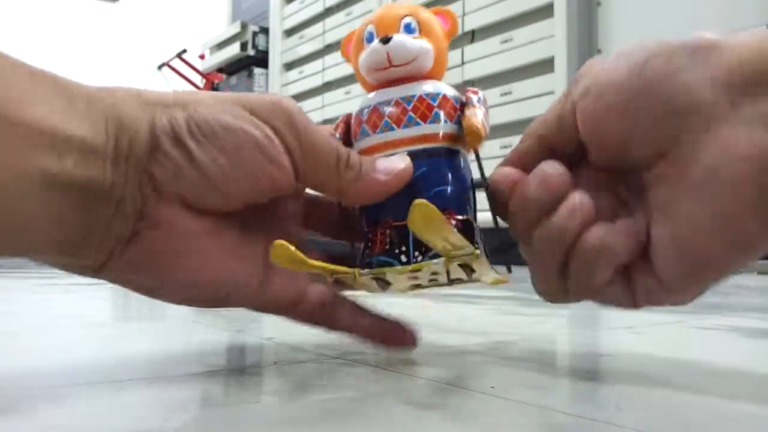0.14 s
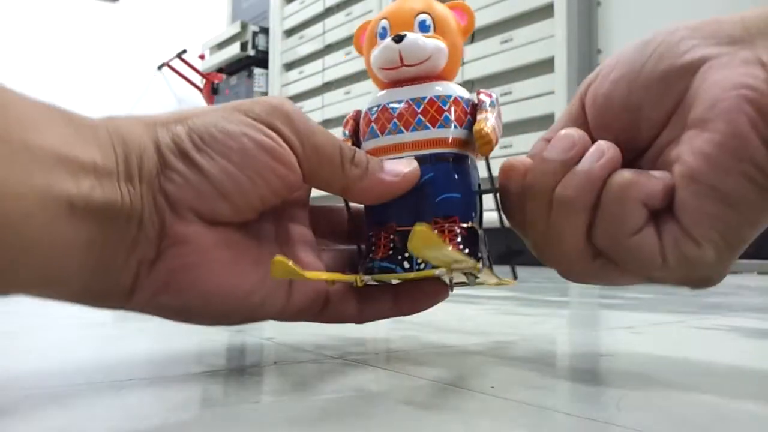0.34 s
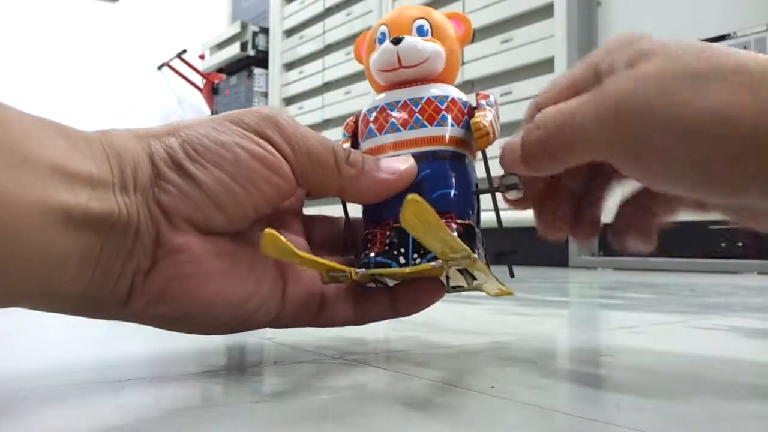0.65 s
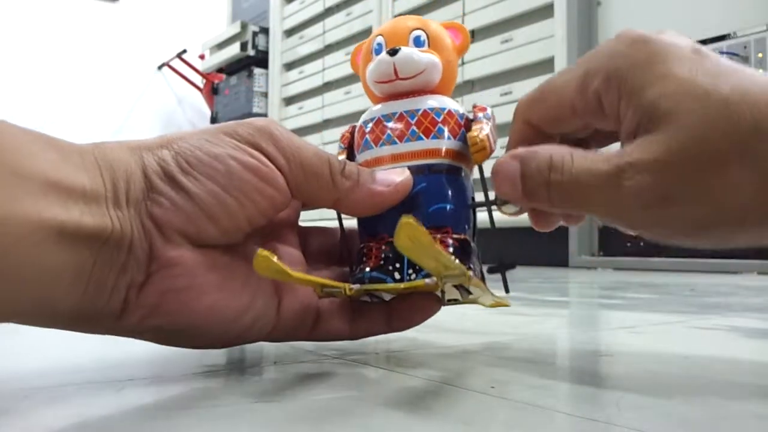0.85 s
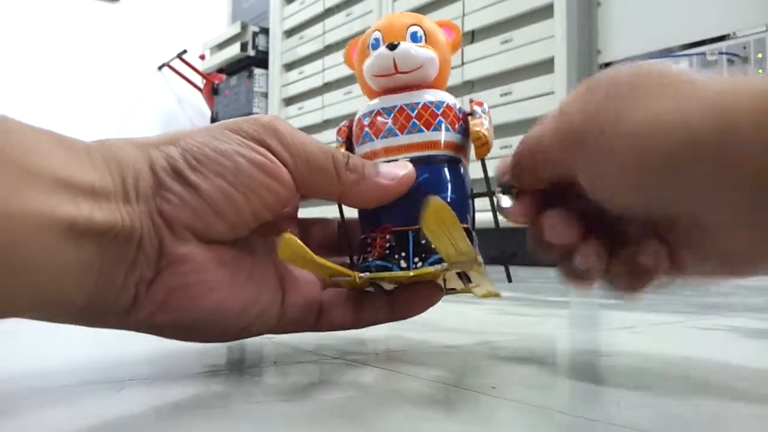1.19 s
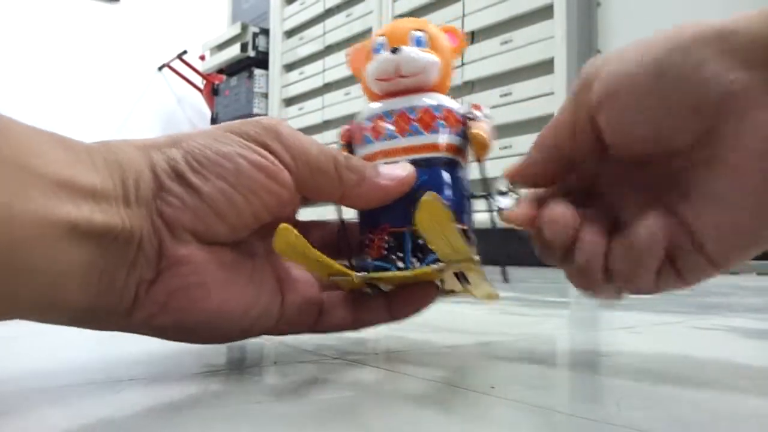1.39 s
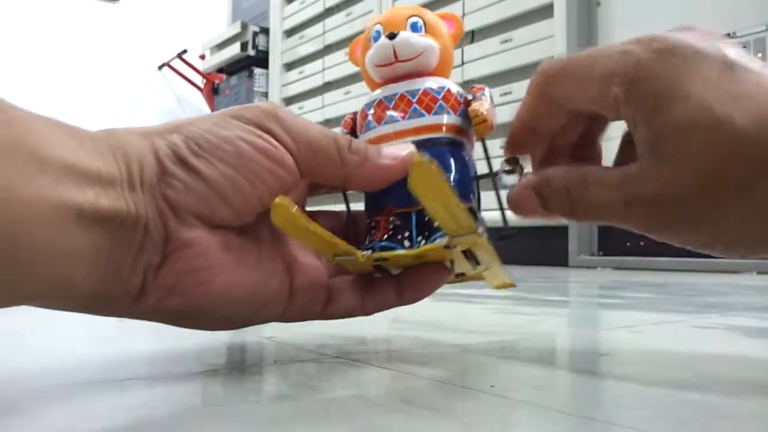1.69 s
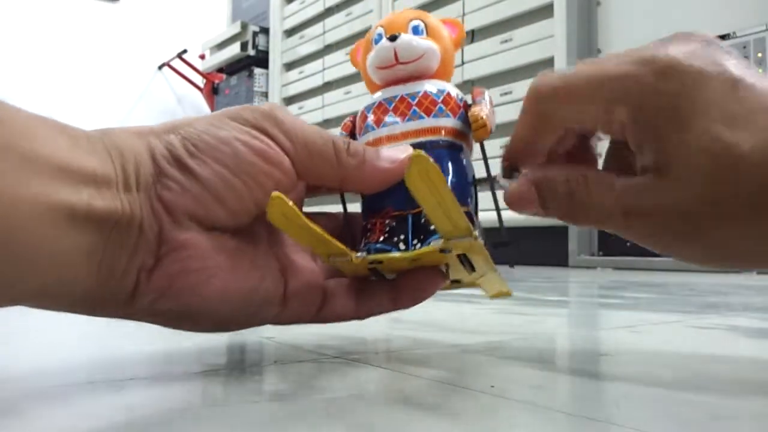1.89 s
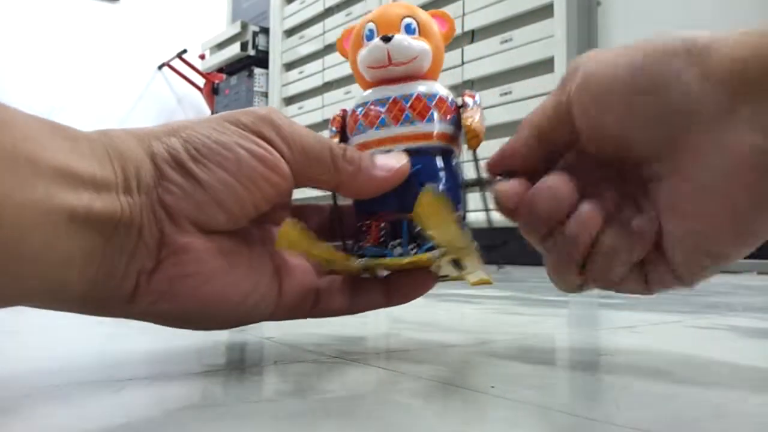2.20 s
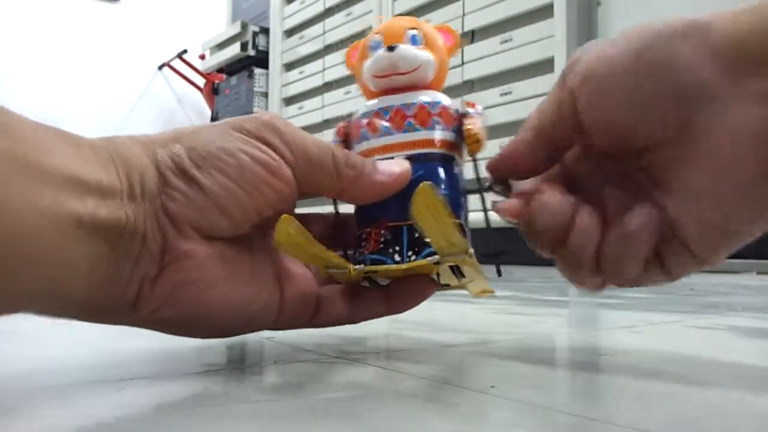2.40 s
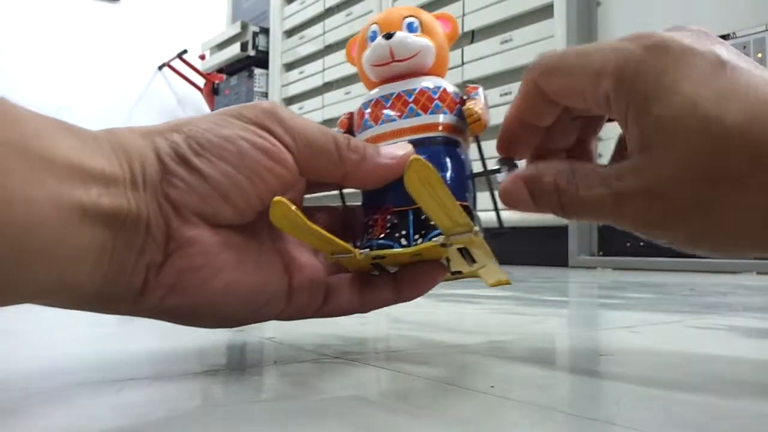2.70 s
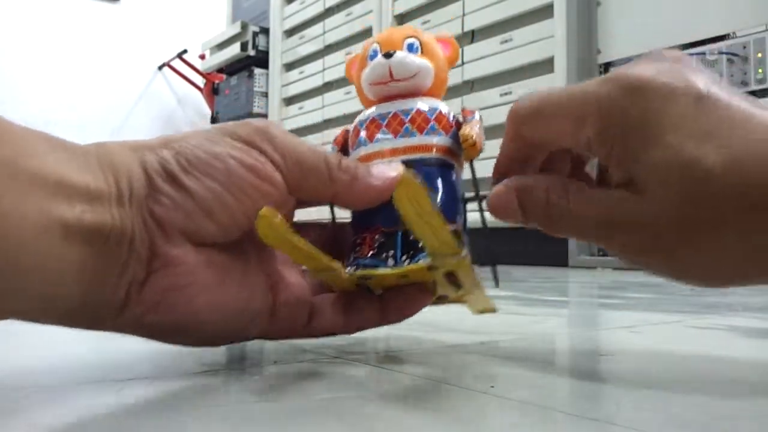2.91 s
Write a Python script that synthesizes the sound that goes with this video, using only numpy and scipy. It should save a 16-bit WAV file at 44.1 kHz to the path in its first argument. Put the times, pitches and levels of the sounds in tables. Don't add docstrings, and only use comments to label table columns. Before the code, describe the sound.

Wind-up tin toy being wound by hand, sharp metallic ratchet clicks over steady fan hum

```python
import sys
import numpy as np
from scipy import signal
from scipy.fft import rfft, irfft, next_fast_len
from scipy.io import wavfile
from scipy.ndimage import uniform_filter1d, map_coordinates

SR = 44100
rng = np.random.default_rng(int(sys.argv[2]) if len(sys.argv) > 2 else 0)


def inscribe(sig):
    pcm = np.round(np.clip(np.atleast_2d(sig).T, -1, 1) * 32767)
    wavfile.write(sys.argv[1], SR, pcm.astype(np.int16))


def gain_from_db(level_db):
    decades = np.asarray(level_db, float) / 20
    return 10 ** decades


N = 134505


def unit(x):
    return x / np.sqrt(np.mean(x ** 2) + 1e-20)


def along(points, hz):
    f, value = np.transpose(points)
    return np.interp(np.log(hz + 1), np.log(f + 1), value)


def curve(rows):
    seconds, value = np.transpose(rows)
    return np.interp(np.arange(N) / SR, seconds, value)


def wobble(rate):
    knots = rng.standard_normal(200)
    return map_coordinates(knots, [np.arange(N) * min(rate, 60) / SR])


def filtered(x, response):
    size = next_fast_len(N + 8192)
    hz = np.fft.rfftfreq(size, 1 / SR)
    return irfft(rfft(x, size) * response(hz), size)[..., :N]


def tone(hz, db, drift_hz):
    cycles = np.cumsum(hz + drift_hz * wobble(6)) / SR + rng.random()
    return np.sqrt(2) * gain_from_db(db) * np.sin(2 * np.pi * cycles)


# start in seconds, peak in dB, rattle length in seconds, brightness in dB per octave,
# the mode rung hardest in Hz.
PAWL_DROPS = [(0.0162, -6.5, .004, -1, 11100), (0.0217, -2.5, .005, 6.5, 5630),
              (0.2573, -8, .005, -1.5, 6400), (1.032, -23, .004, -11, 5200),
              (1.1325, -4.5, .005, 4.5, 4460), (1.149, -13, .003, 0, 4800), (1.2083, 1, .004, 10.5, 5360),
              (1.395, -11, .005, 5, 14300), (1.905, -8.5, .002, 9, 6450), (2.0002, -4.5, .007, 0, 10900),
              (2.0435, -15, .003, -4, 5060), (2.087, -4.5, .003, 4, 11500), (2.0922, -5, .005, 6, 4400),
              (2.177, -8.5, .004, 9, 6400), (2.184, -6.5, .004, 5, 5900), (2.406, -11, .004, -1.5, 14300),
              (2.417, -13, .004, 0, 5070)]
# pitch in Hz, level in dB, 60 dB decay time in seconds.
TIN_MODES = [(1680, -11, .03), (3250, -4, .028), (4460, -8, .022), (4980, -6, .014), (5350, -3, .016),
             (5900, -1.5, .014), (6400, -2.5, .016), (7550, -7, .01), (8350, -6, .012), (10450, -8, .012),
             (11200, -3, .016), (12000, -3, .013), (13100, -5, .024), (14300, -9, .06)]


def ratchet():
    contacts, drops = 7, len(PAWL_DROPS)
    detune, mode_scatter_db = .009, 2.5
    favour_peak_db, favour_octaves = 10, .07
    crack_db, crack_t60 = 5, .005
    fade_db, drop_level_db = 7.5, -8
    out = np.zeros((2, N + SR))
    t = np.arange(SR // 14) / SR
    hz, level, t60 = np.transpose(TIN_MODES)[:, :, None]
    chance = rng.standard_normal((drops, contacts, 3, len(TIN_MODES), 1))
    when = (np.arange(contacts) + rng.random((drops, contacts))) / contacts
    for (start, peak_db, length, tilt_db, best_hz), lucks, shares in zip(PAWL_DROPS, chance, when):
        favour_db = favour_peak_db * np.exp(-(np.log2(hz / best_hz) / favour_octaves) ** 2)
        struck_db = level + favour_db + tilt_db * np.log2(hz / 7500)
        rattle = np.zeros((2, 2 * len(t)))
        for (pitch_luck, level_luck, phase_luck), share in zip(lucks, shares):
            phase = 2 * np.pi * hz * (1 + detune * pitch_luck) * t
            gain = gain_from_db(struck_db + mode_scatter_db * level_luck - 60 * t / t60)
            left = (gain * np.sin(phase)).sum(0)
            right = (gain * np.sin(phase + phase_luck)).sum(0)
            crack = gain_from_db(crack_db - 60 * t / crack_t60) * np.diff(rng.standard_normal((2, len(t) + 1)))
            contact = np.array([left, right]) + crack
            rattle[:, round(share * length * SR):][:, :len(t)] += gain_from_db(-fade_db * share) * contact
        strongest = np.sqrt(uniform_filter1d(rattle ** 2, size=64).max())
        out[:, round(start * SR):][:, :2 * len(t)] += gain_from_db(peak_db + drop_level_db) * rattle / strongest
    return out[:, :N]


# time in seconds, scrape level in dB.
SCRAPE_LEVEL = [(0, -60), (.06, -33), (.12, -26.5), (.18, -25), (.235, -25), (.26, -28.5), (.31, -38),
                (.66, -60), (.76, -38.5), (.92, -39), (1.0, -79), (2.8, -65.5), (2.87, -30), (2.92, -60),
                (3.05, -66)]
# pitch in Hz, width in Hz, level in dB.
KEY_RESONANCES = [(3240, 80, 0.5), (4900, 600, -12), (6150, 200, -6), (7920, 200, -5), (10800, 200, -5),
                  (11350, 320, 0), (12750, 250, -6), (14200, 400, -9)]


def key_response(f):
    total = 0
    for k, (centre, width, db) in enumerate(KEY_RESONANCES):
        band = 1j * f * width / (centre * centre - f * f + 1j * f * width)
        total = total + (-1) ** k * gain_from_db(db) * band
    return total


def scrape():
    grains_per_s, uneven_db = 5000, 1.6
    slipping = rng.random((2, N)) < grains_per_s / SR
    force = gain_from_db(uneven_db * rng.exponential(size=(2, N))) * rng.standard_normal((2, N))
    return gain_from_db(curve(SCRAPE_LEVEL) + 2 * wobble(60)) * unit(filtered(slipping * force, key_response))


# frequency in Hz, left port over right in dB.
HAND_SHADOW = [(2000, -3), (5000, -10), (7000, -7), (9500, -4), (11500, -7), (14000, -14)]


def shaded(toy):
    half = np.array([[0.5], [-0.5]])
    return filtered(toy, lambda hz: gain_from_db(along(HAND_SHADOW, hz) * half))


def hall(x):
    t60 = .12
    t = np.arange(SR // 3) / SR
    tail = rng.standard_normal((2, len(t))) * gain_from_db(-60 * t / t60)
    return signal.fftconvolve(x, tail / np.linalg.norm(tail[0]), axes=1)[:, :N]


# frequency in Hz, level in dB.
AIR_SPECTRUM = [(22, -23.5), (60, -9), (200, -1), (400, -9), (560, -9), (1100, -15), (3000, -19.5),
                (15000, -33.5)]
# frequency in Hz, likeness from 0 to 1.
AIR_LIKENESS = [(60, 0.94), (200, 0.88), (400, 0.56), (800, 0.37), (1300, 0.42), (2500, 0.017)]


def fan_air():
    def mid_and_side(hz):
        turn = np.arccos(np.clip(along(AIR_LIKENESS, hz), -1, 1)) / 2
        return gain_from_db(along(AIR_SPECTRUM, hz)) * [np.cos(turn), np.sin(turn)]

    mid, side = filtered(rng.standard_normal((2, N)), mid_and_side)
    return gain_from_db(-19.5) * unit(np.array([mid + side, mid - side]))


# pitch in Hz, rms level in dB, unsteadiness in dB, pitch drift in Hz.
BLADE_TONES = [(130.4, -26, 1.5, 1.98), (167.9, -31.5, 5.5, 3.34), (222.1, -36.5, 3, 4.18),
               (66, -50.5, 3.5, 2.05), (466, -37.5, 1, 5.62), (524.3, -39, 3, 6), (599, -43, 5.5, 4.05)]
# time in seconds, rms level in dB.
BEATING_LEVEL = [(0.0, -51), (0.1, -23), (0.34, -28.5), (0.37, -33), (1.07, -23.5), (1.16, -32),
                 (2.05, -20), (2.39, -35.5), (2.43, -23), (2.65, -47), (2.8, -18.5), (3.05, -19)]


def fan_blades():
    hum = sum(tone(hz, db + swing_db * wobble(7), drift) for hz, db, swing_db, drift in BLADE_TONES)
    beating_db = curve(BEATING_LEVEL) - .7 + 0.9 * wobble(8.34)
    return hum + tone(194.4, beating_db, 2.08)


# pitch in Hz, rms level in dB.
WHINE_TONES = [(4700, -56.5), (4851, -55), (9700, -70), (9900, -59.5), (10000, -56), (10050, -53),
               (10200, -54), (10300, -56)]


def power_whine():
    return sum(tone(hz, db + 4.6 * wobble(2.52), 2.58) for hz, db in WHINE_TONES)


def fans():
    lag_s = -.0004
    half_lag = lag_s / 2 * np.array([[1], [-1]])
    equipment = fan_air() + fan_blades() + power_whine()
    return filtered(equipment, lambda hz: np.exp(-2j * np.pi * hz * half_lag))


def scene():
    toy = shaded(ratchet() + scrape())
    return toy + gain_from_db(-12) * hall(toy) + fans()


def causal(points):
    hz = np.fft.rfftfreq(4096, 1 / SR)
    cepstrum = irfft(np.log(gain_from_db(along(points, hz))))
    cepstrum[1:2048] *= 2
    cepstrum[2049:] = 0
    return irfft(np.exp(rfft(cepstrum)))


# frequency in Hz, gain in dB.
LEFT_RESPONSE = [(60, 6.5), (1200, 0), (4500, -0.5), (7500, 2.5), (11300, 11.5), (13000, 7.5), (14450, 1.5),
                 (15100, -20)]
# frequency in Hz, gain in dB.
RIGHT_RESPONSE = [(60, -4.5), (400, 1.5), (1300, 3), (3000, 1), (4700, 9.5), (6000, 1), (8800, -10),
                  (14500, -19.5)]


def ports(dry):
    responses = np.array([causal(LEFT_RESPONSE), causal(RIGHT_RESPONSE)])
    return np.clip(signal.fftconvolve(dry, responses, axes=1)[:, :N], -1, 1)


# frequency in Hz, threshold in dB.
QUIET_THRESHOLD = [(6000, -75), (8000, -60), (9300, -58), (10100, -61), (10700, -55), (13000, -55),
                   (14300, -51)]


def muted(x):
    hz, _, z = signal.stft(x, SR, nperseg=2048)
    band_power = (abs(z[:, :1024]) ** 2).reshape(2, 64, 16, -1).sum(2)
    power = np.repeat(band_power, 16, axis=1)
    z[:, :1024] *= power > gain_from_db(2 * along(QUIET_THRESHOLD, hz[:1024]))[:, None]
    return signal.istft(z, SR, nperseg=2048)[1][:, :N]


def top_cut(x):
    return signal.sosfilt(signal.butter(12, 15010, fs=SR, output="sos"), x)


def record(dry):
    mix = muted(ports(dry))
    return top_cut(mix)


dry = scene()
out = record(dry)
inscribe(out)
```